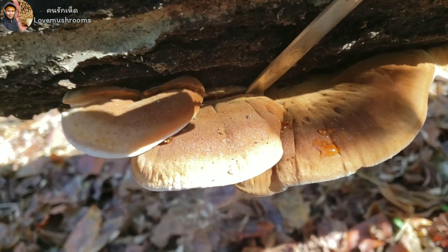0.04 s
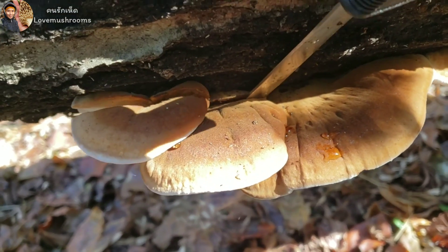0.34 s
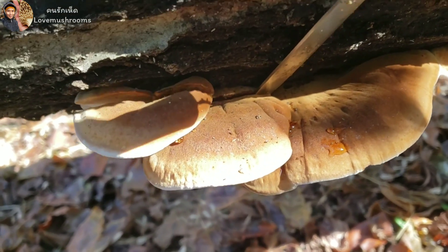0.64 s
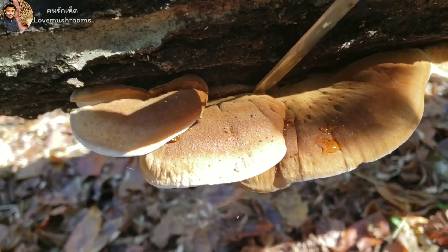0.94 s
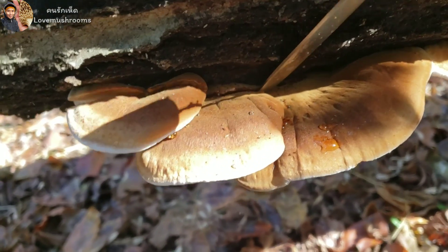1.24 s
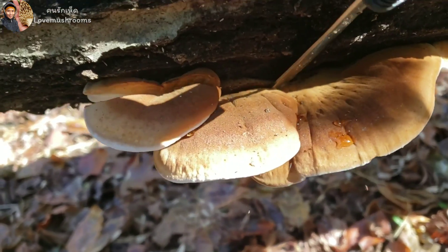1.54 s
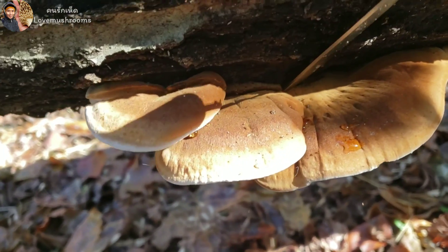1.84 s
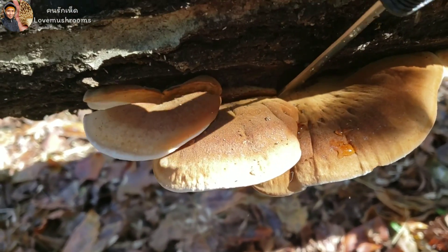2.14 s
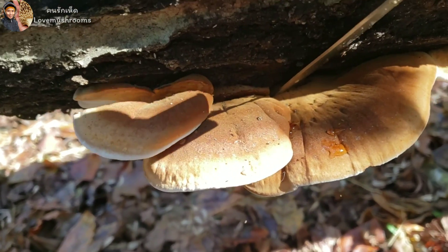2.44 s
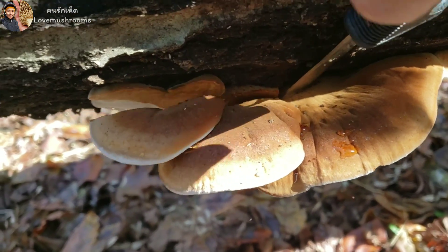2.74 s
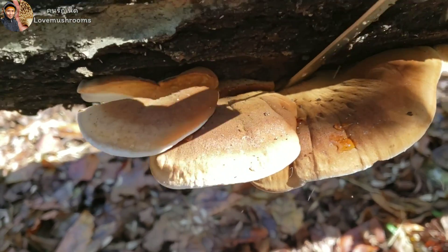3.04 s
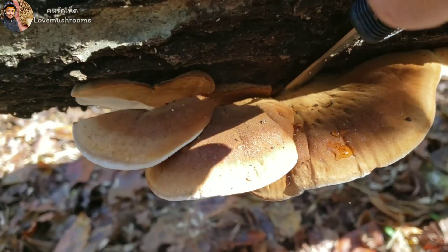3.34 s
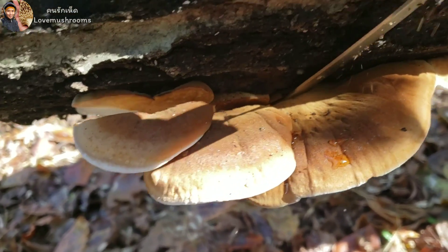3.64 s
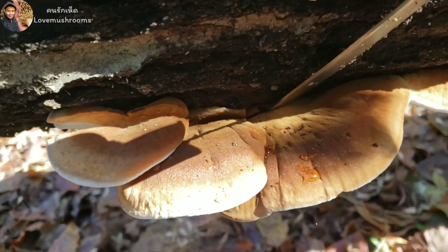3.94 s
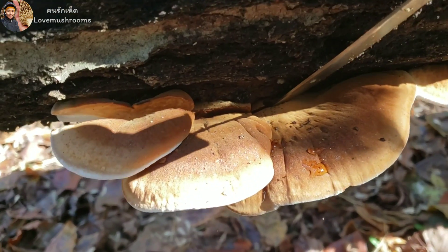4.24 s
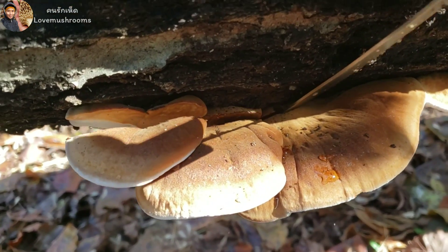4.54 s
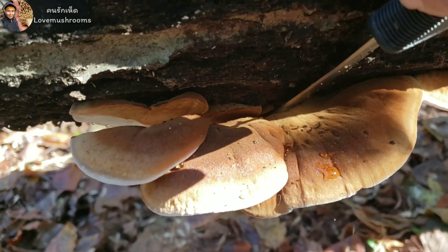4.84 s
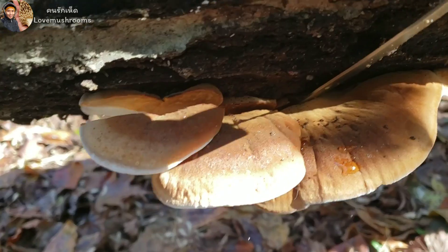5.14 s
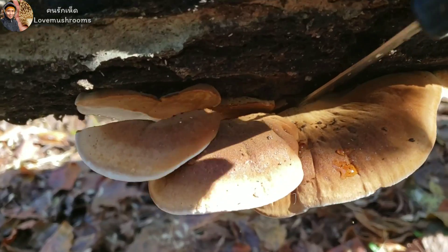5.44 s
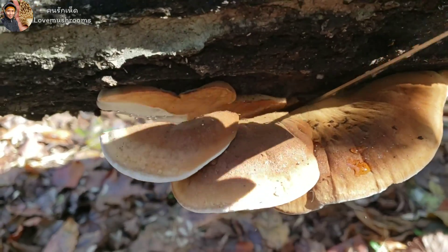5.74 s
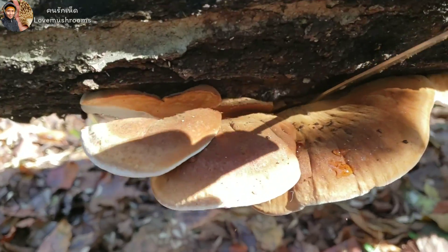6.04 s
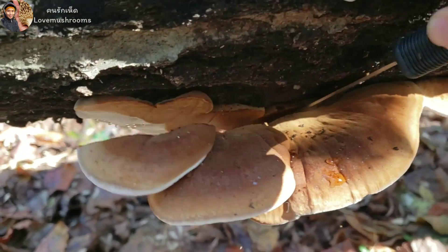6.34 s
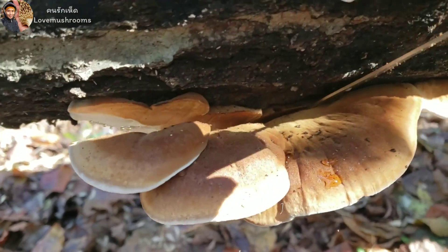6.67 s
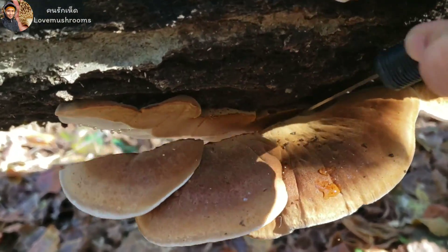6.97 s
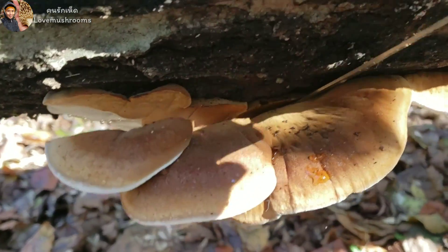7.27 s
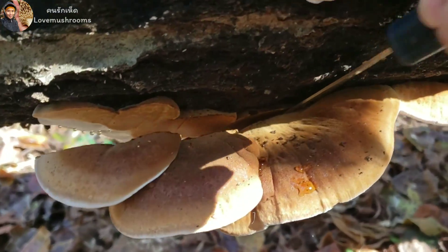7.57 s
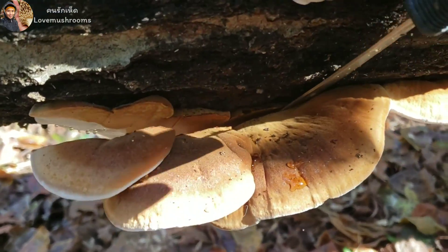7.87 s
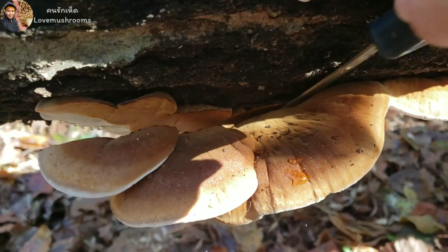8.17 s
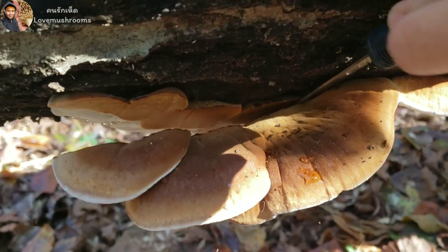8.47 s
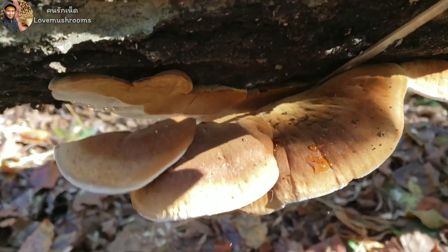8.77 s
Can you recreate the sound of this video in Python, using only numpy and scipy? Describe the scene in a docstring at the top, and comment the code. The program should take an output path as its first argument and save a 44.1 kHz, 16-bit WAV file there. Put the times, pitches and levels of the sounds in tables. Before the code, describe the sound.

A knife saws through a damp bracket fungus on a log, with short wet squeaks, grainy rasps and occasional dull taps.

```python
"""In a still forest, a knife saws through the damp flesh of a bracket fungus on a log, close to a phone.
The edge tears tiny cells into a grainy rasp and a wet hiss. Where the flesh grips the blade it sticks
and slips, squeaking upward as it speeds up and downward as it slows. The tip grates, thumps and taps
on the log, the flat of the blade brushes the bark, and now and then a fibre snaps.
Underneath lie faint air and the low rumble of the hand that holds the phone."""
import sys
import numpy as np
from scipy import signal
from scipy.fft import rfft, irfft, next_fast_len
from scipy.io import wavfile
from scipy.ndimage import uniform_filter1d

SR = 44100
rng = np.random.default_rng(int(sys.argv[2]) if len(sys.argv) > 2 else 0)


def output_pcm(signal):
    """Save a mono or channel-first signal as 16-bit PCM at the path in sys.argv[1].

    Samples are clipped to [-1, 1] before scaling.
    """
    pcm = np.clip(np.atleast_2d(signal).T, -1, 1) * 32767
    wavfile.write(sys.argv[1], SR, np.round(pcm).astype(np.int16))


N = 397341
TIME = np.arange(N) / SR
TOP_HZ = 15650

# forest air tone: (frequency [Hz], gain [dB])
AIR_EQ = [(150, -4), (260, 6), (430, 3), (800, 2), (1300, -2), (2000, -2), (3500, -2), (5500, -6),
          (7200, -5), (8600, -9), (10500, -1), (15000, -2)]
# low end shared by hand rumble and log thumps: (frequency [Hz], gain [dB])
THUMP_EQ = [(20, -21), (40, -9), (58, 2.5), (90, -5.5), (150, -12), (250, -22), (500, -35.5)]
# fader ride of the hand rumble: (time [s], level [dB])
HAND_RIDE = [(0, -64), (1.0, -65.5), (1.7, -64), (2.5, -66.5), (2.95, -63), (3.3, -67.5), (4.6, -69.5),
             (5.3, -66), (5.9, -63.5), (6.7, -68.5), (7.1, -64), (9.0, -68.5)]

# pushes of the blade: (start [s], length [s], attack [s], release [s], rasp [dB],
# rise over the stroke [dB], deep layer against rasp [dB], hiss [dB], hiss left minus right [dB])
PUSH_CUES = [(0.0, .095, 0.0013, 0.014, -65.5, 14, 1, -58.5, -29.5),
             (0.051, 0.22, .012, 0.018, -53.5, 13.5, 5.5, -50.5, -8.5),
             (0.713, 0.18, 0.0078, 0.087, -52.5, 12.5, -1, -56, -8),
             (1.292, 0.19, 0.055, 0.1, -47, 14, -3, -50.5, -8),
             (1.947, 0.25, 0.092, 0.083, -44.5, -2.5, -4, -55, -6.5),
             (2.604, 0.2, 0.071, 0.026, -45, -7, -7.5, -53, -4),
             (3.248, 0.17, 0.043, 0.051, -49, -3.5, -5, -60, -3),
             (4.08, 0.18, 0.024, .06, -66.5, 9, -22.5, -67, -12),
             (4.565, 0.24, 0.062, 0.015, -49, -6, -6.5, -59, -5),
             (5.358, 0.32, 0.11, 0.23, -46, 3, -4.5, -53.5, -6),
             (6.11, 0.222, 0.049, 0.021, -47, -10, -6, -54.5, -0.5),
             (6.834, 0.22, 0.052, 0.011, -48, -8, -8.5, -54.5, -4),
             (7.502, 0.21, 0.081, 0.049, -51, 0, -9, -54.5, -2.5),
             (7.996, 0.15, 0.046, 0.019, -51, -1.5, -10.5, -51.5, -3),
             (8.399, .15, 0.057, 0.012, -54.5, -2.5, -6, -50, -5),
             (8.801, 0.21, 0.077, 0.15, -54.5, 13, -0.5, -51, -5)]
# pulls of the blade: (start [s], length [s], rasp [dB], rise over the stroke [dB],
# deep layer against rasp [dB], hiss [dB], hiss left minus right [dB])
PULL_CUES = [(0.448, 0.14, -52, 7.5, -3.5, -58.5, -1), (0.95, 0.18, -50, 12, -5, -55, -5),
             (1.623, 0.2, -49.5, 0, -4, -53, -8.5), (2.354, 0.09, -47.5, 5, -1, -51.5, -6),
             (2.92, 0.13, -47.5, -2, -3.5, -57.5, -7.5), (3.577, 0.25, -48.5, 5, -6, -55, -4.5),
             (5.054, 0.14, -49.5, -2, -6, -54, -5), (5.732, 0.23, -48.5, 16, -8, -58, 0),
             (6.462, .19, -46.5, 11.5, -13, -57, -1), (7.194, 0.22, -49, 11.5, -11.5, -56, -1.5),
             (7.785, 0.14, -51.5, 10, -13.5, -55, -4.5), (8.213, 0.16, -54, -2, -8.5, -54, -2.5),
             (8.616, 0.16, -56.5, -9, -6, -56, -5)]
# rasp of the flesh: (frequency [Hz], gain [dB])
RASP_EQ = [(1400, -39.5), (2000, -14.5), (2500, -2), (3100, 4), (3700, -2), (4400, -4.5), (5400, -21),
           (7000, -47.5)]
# deeper rasp from the thick base of the fungus: (frequency [Hz], gain [dB])
DEEP_RASP_EQ = [(400, -37), (750, -12), (1130, -21), (1450, -1), (1900, 3.5), (2300, 0.5), (3000, -20),
                (5000, -37)]
# wet hiss along the steel: (frequency [Hz], gain [dB])
HISS_EQ = [(3000, -18), (5500, -6.5), (7100, 1.5), (8300, -5), (9600, 2.5), (11000, 2.5), (13300, -10.5),
           (15300, -9)]

# stick-slip squeaks: (start [s], length [ms], start pitch [Hz], middle pitch [Hz], end pitch [Hz],
# level [dB], peak position [0-1], roughness [0-1], overtones [dB])
SQUEAK_CUES = [(0.058, 28, 1074, 1352, 1550, -28, 1, .15, -9),
               (0.076, 33, 2220, 2570, 2950, -25.5, 0.15, .16, -4.5),
               (0.1, 23, 2080, 1970, 1900, -37, 0.4, .3, -5.5),
               (0.118, 88.6, 1973, 1780, 2043, -20, 0.47, 0, -10),
               (0.222, 13, 1706, 1910, 2000, -31, 0.9, .8, -5),
               (0.234, 34, 1928, 2120, 1990, -29, 0.4, 0, 0.5),
               (0.261, 16.7, 1787, 1524, 1316, -38.5, 0.1, 0.94, -3.5),
               (0.44, 35.4, 1004, 1660, 2540, -25.5, 0.71, 0.5, -7.5),
               (0.544, 9.5, 2510, 2073, 1830, -24.5, 0.3, 0, -2),
               (0.552, 22.6, 1860, 1511, 970, -25.5, 0.1, 0.4, -11.5),
               (0.714, 16.3, 1110, 1222, 1450, -37, 0.9, 0, -6.5),
               (0.727, 34, 1580, 2200, 2590, -29.5, .3, .24, -2.5),
               (0.746, 29.7, 1605, 1840, 2180, -24, .4, 0.07, -14),
               (0.964, 24.7, 1306, 1480, 2310, -28, 0.97, 0.38, -5),
               (1.1, 21.6, 2560, 2025, 1590, -29.5, 0.73, 0.28, 1.5),
               (1.652, 28.7, 1107, 1394, 1770, -33, 1, 0.44, -4),
               (1.793, 27.4, 1997, 1440, 1190, -28.5, 0.2, 0.28, -8),
               (1.993, 56, 1380, 1970, 3190, -45, 0.44, 0.42, -9),
               (2.311, 40.8, 1667, 2032, 3460, -29, 0.92, 0.28, 10),
               (2.411, 23, 2012, 1550, 1210, -22.5, 0.33, .35, -0.5),
               (2.917, 17, 677, 900, 1220, -20, 1, 0.37, -1.5),
               (2.932, 16, 1497, 1828, 2280, -22.5, .25, 0.74, 0),
               (2.937, 28.8, 2350, 2896, 3730, -17.5, .65, .18, -1.5),
               (3.009, 20, 3690, 2585, 2285, -24.5, 0.28, 0, 5.5),
               (3.024, 14, 2255, 1795, 900, -24.5, 0.23, 0.47, 0),
               (3.571, 24, 727, 855, 1197, -22.5, 1, 0.6, -2.5),
               (3.589, 13.6, 2424, 2572, 2950, -16, 0.6, 0.5, -9),
               (3.594, 21.4, 1807, 2095, 2530, -18, 0.23, .26, -7),
               (3.785, 21.5, 3550, 2605, 1600, -21.5, 0.35, 0.27, 1.5),
               (5.063, 20.8, 2013, 2963, 3790, -25, 0.78, 0.37, 1.5),
               (5.172, 16.9, 3430, 2180, 1330, -24, 0.17, 0.27, -9),
               (5.557, 20, 1555, 1405, 1290, -38.5, 0.2, 0.31, 3),
               (5.569, 21, 1366, 1543, 1720, -40, 0.4, 0.43, -4.5),
               (5.73, 26.6, 934, 1062, 1240, -28, 0.6, 0.4, -1.5),
               (5.747, 18.9, 2040, 2866, 3530, -19, 0.39, 0.36, -11),
               (5.916, 24.4, 3310, 2650, 1780, -15.5, 0.47, .16, -3),
               (5.936, 16.8, 1870, 1305, 800, -23.5, 0, .55, -0.5),
               (6.309, 12, 2395, 1830, 1404, -35.5, 0.4, 0.51, -11.5),
               (6.459, 29, 1377, 1545, 1806, -24.5, 0.9, 0.39, 0.5),
               (6.484, 14.3, 3130, 3385, 3670, -21.5, 0.2, 0.2, -8),
               (6.586, 57, 3970, 3285, 2930, -30.5, 0.66, 0.13, 11.5),
               (6.629, 26.6, 2555, 2297, 2170, -24, 0.25, 0.1, 4.5),
               (6.648, 19.4, 2130, 1605, 1263, -30, 0.4, 0.51, 4),
               (6.855, 28.8, 2270, 2480, 3560, -26.5, 0.76, 0.05, -2),
               (7.063, 10.2, 2040, 1740, 1410, -48, 0.57, 0.9, -11),
               (7.174, 22, 1880, 2160, 2580, -42, 0.84, 0.45, 7),
               (7.191, 25.6, 2730, 3235, 3430, -25.5, 0.24, 0.3, -4),
               (7.333, 46, 4020, 3480, 3060, -21.5, 0.9, .07, -2),
               (7.374, 18.3, 2193, 1834, 1410, -26.5, 0.78, .3, -0.5),
               (7.552, 38, 2215, 2300, 2410, -41.5, 0.4, 0.09, -7),
               (7.784, 24, 3370, 4060, 4000, -43, 0.53, 0.41, -16),
               (7.893, 16, 3530, 2275, 1550, -29.5, 0.27, 0.28, 1),
               (8.135, 10.2, 2960, 2090, 1610, -35.5, 0.5, 0.34, -3.5),
               (8.224, 10.6, 2380, 2705, 3200, -36, 0.95, 0.28, -13),
               (8.341, 13.7, 2795, 2290, 1820, -35, 0.36, 0.42, 0.5),
               (8.544, 9.7, 2020, 1740, 1330, -31.5, 0.64, 0.47, -4),
               (8.627, 20.6, 1570, 1840, 2570, -22.5, 0.8, 0.19, -5.5),
               (8.745, 13.3, 2765, 2276, 1420, -29.5, 0.45, 0.48, -14)]
# body of a squeak: (frequency [Hz], gain [dB])
SQUEAK_EQ = [(300, -33.5), (520, -28.5), (760, -5.5), (1100, -18.5), (1500, -1.5), (1900, -1), (3100, 4.5),
             (4000, -1), (5500, -12), (7000, -9.5), (8500, -22.5), (10700, -4), (13000, -24.5),
             (15000, -29.5)]

# the flat of the blade on the bark: (peak time [s], level [dB], rise [s], decay [s])
BRUSH_CUES = [(0.08, -44, .014, .012), (1.381, -36, 0.023, 0.0068), (1.883, -32, 0.0057, .037)]
# bright, dry bark: (frequency [Hz], gain [dB])
BARK_EQ = [(800, -12), (1600, -6.5), (2600, -4.5), (3600, 6.5), (5300, -1), (7500, 8.5), (8300, 4),
           (10000, 10), (12000, 7), (15300, 3)]

# the tip bears on the log: (start [s], grating length [s], grating [dB], thump [dB])
BUMP_CUES = [(0.196, 0.056, -46.5, -47), (0.563, 0.026, -51, -64.5), (0.816, 0.072, -53, -60.5),
             (1.432, 0.053, -49, -49), (2.111, 0.071, -49, -60), (2.432, 0.021, -47, -63.5),
             (2.72, 0.032, -37.5, -49.5), (2.768, 0.017, -39, -48.5), (3.023, .024, -38, -50.5),
             (3.295, 0.075, -53.5, -78), (3.367, 0.039, -48, -47.5), (3.593, 0.088, -45, -53.5),
             (4.707, 0.041, -54, -53), (4.744, 0.086, -61.5, -58.5), (5.502, 0.041, -51.5, -81),
             (5.532, .075, -59.5, -48.5), (6.018, .04, -77.5, -46.5), (6.273, .042, -51, -44),
             (6.974, 0.12, -46, -40.5), (7.204, 0.064, -56.5, -56.5), (7.634, 0.086, -60.5, -65),
             (8.113, 0.041, -53, -50), (8.538, 0.042, -69, -52.5)]
# woody midrange of the grating: (frequency [Hz], gain [dB])
GRATE_EQ = [(130, -25.5), (240, -10), (340, -5.5), (520, -4), (720, 8), (950, 6), (1150, -11), (1600, -9),
            (3000, -26)]

# snapping fibres: (time [s], edge [dB], knock [dB], left minus right [dB])
SNAP_CUES = [(0.2115, -53.5, -36.5, -4), (0.2321, -47.5, -48.5, -3.5), (0.9467, -56, -43.5, 1),
             (0.9586, -65, -48.5, 16), (1.4357, -35, -48.5, 9), (1.5857, -51.5, -91, 10),
             (1.614, -60.5, -93, 1), (2.1473, -45.5, -62, 1), (2.5068, -56, -63.5, -3),
             (2.6963, -37, -27.5, 4), (3.0869, -61.5, -67.5, 2), (5.217, -63.5, -69, -10.5),
             (6.0406, -57.5, -72, -18.5), (6.09, -67.5, -69, -5), (6.3125, -65, -55, 14),
             (6.333, -61, -61.5, 5), (7.064, -63, -48.5, 17)]
# a snap's knock in the flesh: (frequency [Hz], gain [dB])
SNAP_KNOCK_EQ = [(300, -38.5), (750, -26.5), (1100, -7.5), (1600, 4.5), (3200, 9.5), (4300, 6.5),
                 (6000, -38.5), (10000, -44.5)]
# a snap's sharp edge: (frequency [Hz], gain [dB])
SNAP_EDGE_EQ = [(2500, -17.5), (4500, -13.5), (7000, 9), (8500, -7), (10500, 9.5), (15000, -17)]

# the tip taps the log: (time [s], level [dB])
TAP_CUES = [(2.735, -24), (2.777, -47), (2.783, -38.5), (2.978, -43.5), (3.3, -44.5), (3.381, -43.5),
            (3.625, -30), (3.648, -40), (4.349, -61.5), (4.716, -43.5), (4.745, -45), (4.79, -52.5),
            (7.02, -33.5)]
# modes of the soft, rotten wood: (frequency [Hz], level [dB], time to fall 60 dB [s])
WOOD_MODES = [(227, -14.5, .06), (430, -11, 0.016), (577, -1.5, .028), (715, 4.5, 0.039),
              (905, -17.5, 0.013), (1728, 0.5, 0.016)]

# stereo image of the air and rumble: (frequency [Hz], left-right likeness [0-1])
BED_IMAGE = [(50, 1), (250, 1), (500, 0.2), (15000, 0.13)]
# stereo image of the knife noises: (frequency [Hz], left-right likeness [0-1])
CLOSE_IMAGE = [(50, 0.24), (700, 1), (3200, 0.54), (4500, 0.24), (8000, 0.067), (15000, .1)]
# balance between the phone's two microphones: (frequency [Hz], left minus right [dB])
MIC_BALANCE = [(50, -6), (250, 0.73), (750, 0), (2500, 1), (3600, 1), (5000, -4), (7200, 0.33), (10000, -6),
               (12000, -6), (13500, -14), (15300, -5)]
# the left microphone hears the treble later: (frequency [Hz], left phase lead [rad])
MIC_PHASE = [(700, 0.5), (2200, 0.1), (3200, 0.35), (4100, -0.76), (5500, -1.5), (7000, -5), (8700, -7),
             (10700, -8.5), (15000, -6.5)]


def undb(db):
    """Decibels to gain."""
    return 10 ** (np.asarray(db) / 20)


def unit(x):
    """Scale to rms 1."""
    return x / np.sqrt(np.mean(x ** 2))


def curve_at(points, hz):
    """Read (frequency [Hz], value) points on a log-frequency axis."""
    point_hz, value = np.transpose(points)
    return np.interp(np.log(hz + 1), np.log(point_hz), value)


def eq(x, points, size=4096):
    """Minimum-phase EQ through (frequency [Hz], gain [dB]) points."""
    gain = undb(curve_at(points, np.fft.rfftfreq(size, 1 / SR)))
    cepstrum = irfft(np.log(gain))
    cepstrum[1:size // 2] *= 2
    cepstrum[size // 2 + 1:] = 0
    response = irfft(np.exp(rfft(cepstrum)))
    return signal.oaconvolve(np.atleast_2d(x), response[None], axes=1)[:, :x.shape[-1]]


def stereo_noise(image):
    """White noise whose two sides are as alike in each band as the image says."""
    size = next_fast_len(N, True)
    likeness = np.clip(curve_at(image, np.fft.rfftfreq(size, 1 / SR)), 0, 1)
    mid, side = rfft(rng.standard_normal((2, size)))
    mid, side = mid * np.sqrt(1 + likeness), side * np.sqrt(1 - likeness)
    return unit(irfft([mid + side, mid - side])[:, :N])


def pan(db):
    """Left and right gains for a left-minus-right level difference."""
    return undb(np.array([[1], [-1]]) * db / 2) / np.cosh(np.log(undb(db / 2)))


def wander(rate):
    """Random modulation with `rate` new values a second and a spread near 1."""
    return np.interp(TIME * rate, np.arange(N // 8), rng.standard_normal(N // 8))


def fade(u):
    """Smooth fade from 0 to 1 as u goes from 0 to 1."""
    return np.sin(np.pi / 2 * np.clip(u, 0, 1)) ** 2


def add(out, start_s, sound):
    """Mix a sound in at its cue."""
    i = int(start_s * SR)
    out[:, i:i + sound.shape[1]] += sound[:, :N - i]


def forest_bed(air_db=-77.7, flutter_db=1.5, sway_db=0.5):
    """Still air hisses faintly; the hand on the phone adds a low, swaying rumble."""
    air = unit(eq(stereo_noise(BED_IMAGE), AIR_EQ)) * undb(air_db + flutter_db * wander(3))
    hand_db = np.interp(TIME, *np.transpose(HAND_RIDE)) + sway_db * wander(8.6)
    rumble = unit(eq(stereo_noise(BED_IMAGE), THUMP_EQ)) * undb(hand_db)
    return air + rumble * pan(-6)


def stroke(length_s, attack_s, release_s, rasp_db, rise_db, deep_db, hiss_db, pan_db,
           grip_db=0, bite_db=0):
    """Envelopes of one stroke (rasp, deep rasp, left hiss, right hiss); slow ends sound darker."""
    t = TIME[:int(length_s * SR)]
    along = t / length_s - .5
    slowness = (2 * along) ** 2
    contact = fade(t / attack_s) * fade((length_s - t) / release_s)
    bite = np.exp(-np.abs(t - attack_s) / .02)  # a brief accent as the edge digs in
    rasp = contact * undb(rasp_db + rise_db * along + grip_db * slowness + bite_db * (bite - bite.mean()))
    deep = rasp * undb(deep_db + 3.5 * (slowness - slowness.mean()))
    hiss = contact * undb(hiss_db - 6 * slowness) * pan(pan_db)
    return np.vstack([rasp, deep, hiss])


def sawing(grain_db=0.5, catch_db=1.5, crackle_db=3, pull_fade_s=0.036, creep_db=-26, creep_s=0.056):
    """The sliding edge tears countless tiny cells: a rasp in the flesh, a wet hiss along the steel."""
    envelopes = np.zeros((4, N))
    for start_s, length_s, *levels in PULL_CUES:
        add(envelopes, start_s, stroke(length_s, pull_fade_s, pull_fade_s, *levels, grip_db=7.5))
    for start_s, *push in PUSH_CUES:
        add(envelopes, start_s, stroke(*push, bite_db=2.5))
    # the blade creeps on faintly after each stroke
    pole = np.exp(-1 / (creep_s * SR))
    envelopes += undb(creep_db) * signal.lfilter([1 - pole], [1, -pole], envelopes + 1e-18)
    tearing = undb(grain_db * wander(1800) + catch_db * wander(90))

    def grains(tone, texture=1):
        return unit(eq(stereo_noise(CLOSE_IMAGE) * tearing * texture, tone))

    rasp = grains(RASP_EQ) * envelopes[0]
    deep = undb(-1) * grains(DEEP_RASP_EQ) * envelopes[1]
    crackle = undb(crackle_db * wander(2500))
    hiss = undb(3) * grains(HISS_EQ, crackle) * envelopes[2:]
    return (rasp + deep) * pan(3) + hiss * pan(5)


def stick_slip(length_ms, pitches_hz, peak, rough, overtone_db, jitter=.25, waver=0.005, flat_top_ms=69):
    """One squeak: a rounded sawtooth whose pitch follows blade speed; torn flesh makes it uneven."""
    n = int(length_ms * SR / 1000)
    progress = np.linspace(0, 1, n)
    timing, strength, grit, drag = rng.standard_normal((4, SR // 8))
    # the blade drags a little faster and slower through the fibres
    drag = np.interp(TIME[:n] * 260, np.arange(len(drag)), drag)
    glide = np.polyval(np.polyfit([0, .5, 1], pitches_hz, 2), progress)
    hz = glide * (1 + waver * drag)
    slips = np.cumsum(hz) / SR

    def per_slip(chance):
        return rough * np.interp(slips, np.arange(len(chance)), chance)

    phase = 2 * np.pi * np.cumsum(hz * (1 + jitter * per_slip(timing))) / SR
    # a clean, sharp release gives stronger overtones
    harmonic = np.arange(2, 11)[:, None]
    rolloff = (harmonic / 2) ** (0.24 + 1.6 * rough)
    overtones = (harmonic * hz < TOP_HZ) * np.sin(harmonic * phase) / 2 / rolloff
    saw = np.sin(phase) + undb(overtone_db) * overtones.sum(axis=0)
    force = saw * undb(8 * per_slip(strength)) + (0.036 + 0.55 * rough) * grit[:n]
    tone = eq(force, SQUEAK_EQ)[0]
    tone /= np.sqrt(uniform_filter1d(tone ** 2, size=300) + 1e-12)  # level it before shaping
    # the grip builds and lets go: short squeaks are pointed, long ones flat on top
    arch = np.interp(progress, [0, np.clip(peak, .15, .85), 1], [0, .5, 1])
    sharpness = 1.33 / (1 + (length_ms / flat_top_ms) ** 3)
    grip = np.abs(np.sin(np.pi * arch)) ** sharpness
    return tone * grip * undb(6 * rough * drag)


def squeaks(wet_db=-31.5, drying_db_per_s=0.04, lead_s=0.0064, lag_s=0.0053, tail_db=-29, tail_s=0.018):
    """Squeaks wrapped in the hiss of the wet blade, with a short scatter off the log and leaves."""
    dry, wetness = np.zeros((2, N)), np.zeros(N)
    for start_s, length_ms, *pitches_hz, db, peak, rough, overtone_db in SQUEAK_CUES:
        place = pan(2.5 + 0.5 * start_s)  # the cut drifts slowly leftward
        add(dry, start_s, undb(db) * place * stick_slip(length_ms, pitches_hz, peak, rough, overtone_db))
        end_s = start_s + length_ms / 1000
        span = slice(int((start_s - lead_s) * SR), int((end_s + lag_s) * SR))
        # a clean squeak tears less, so it hisses less; the blade dries as the cut opens
        tearing = undb(db + wet_db - drying_db_per_s * start_s) * min(1, 0.41 + 2 * rough)
        window = signal.windows.tukey(span.stop - span.start, .7)
        wetness[span] = np.maximum(wetness[span], tearing * window)
    t = TIME[:SR // 6]
    tail = rng.standard_normal((2, len(t))) * np.exp(-t / tail_s)
    tail *= undb(tail_db) / np.sqrt(np.sum(tail[0] ** 2))
    scatter = signal.oaconvolve(dry, tail, axes=1)[:, :N]
    hiss = unit(eq(stereo_noise(CLOSE_IMAGE), HISS_EQ)) * wetness * pan(-1)
    return dry + scatter + hiss


def bark_brushes(grain_db=2.0):
    """Steel skims dry bark in bright swishes that swell and die away."""
    swish = unit(eq(stereo_noise(CLOSE_IMAGE) * undb(grain_db * wander(1000)), BARK_EQ))
    envelope = np.zeros(N)
    for peak_s, db, rise_s, decay_s in BRUSH_CUES:
        slopes = np.minimum((TIME - peak_s) / rise_s, (peak_s - TIME) / decay_s)
        envelope += undb(db) * np.exp(np.maximum(slopes, -20))
    return swish * envelope * pan(-9)


def log_bumps(jerk_db=5, thump_decay_s=0.037):
    """The tip grates over the wood in jerks; the load builds meanwhile and thumps the log."""
    grate_gain, thump_gain = np.zeros((2, 1, N))
    t = TIME[:SR // 3]
    for start_s, length_s, grate_db, thump_db in BUMP_CUES:
        contact = np.sin(np.pi * np.minimum(t / length_s, 1)) ** 2
        add(grate_gain, start_s, undb(grate_db) * contact[None])
        rise_s = 0.37 * length_s
        load = fade(t / rise_s) * np.exp(-np.maximum(t - rise_s, 0) / thump_decay_s)
        add(thump_gain, start_s, undb(thump_db) * load[None])
    grate = unit(eq(stereo_noise(CLOSE_IMAGE) * undb(jerk_db * wander(170)), GRATE_EQ))
    thump = unit(eq(stereo_noise(CLOSE_IMAGE), THUMP_EQ))
    return undb(-1) * grate * grate_gain + thump * thump_gain


def fibre_snaps(decay_s=0.00074, trim_db=11):
    """A fibre parts: a sharp edge over a brief knock in the flesh."""
    out, t = np.zeros((2, N)), TIME[:SR // 40]
    envelope = (t / decay_s) * np.exp(1 - t / decay_s)
    for start_s, edge_db, knock_db, pan_db in SNAP_CUES:
        knock_noise, edge_noise = rng.standard_normal((2, len(t)))
        knock = undb(knock_db + trim_db) * unit(eq(knock_noise, SNAP_KNOCK_EQ))
        edge = undb(edge_db + trim_db) * unit(eq(edge_noise, SNAP_EDGE_EQ))
        add(out, start_s, (knock + edge) * envelope * pan(pan_db))
    return out


def log_taps(scatter_db=2, detune=0.053, contact_s=0.00088):
    """Dull taps of the tip: each rings the same few modes of the log, a little differently."""
    out, t = np.zeros((2, N)), TIME[:SR // 12]
    hz, mode_db, t60 = np.transpose(WOOD_MODES)[:, :, None]
    attack = 1 - np.exp(-t / contact_s)
    for start_s, db in TAP_CUES:
        strength, tuning = rng.standard_normal((2, len(hz), 1))
        decay = undb(mode_db + scatter_db * strength - 60 * t / t60)
        modes = decay * np.sin(2 * np.pi * hz * (1 + detune * tuning) * t)
        add(out, start_s, 3 * undb(db) * modes.mean(axis=0) * attack * pan(0))
    return out


def microphones(knife):
    """The close knife reaches the two microphones with different colours and delays."""
    left = eq(knife[0], [(hz, db / 2) for hz, db in MIC_BALANCE])[0]
    right = eq(knife[1], [(hz, -db / 2) for hz, db in MIC_BALANCE])[0]
    size = next_fast_len(N, True)
    left_lead = curve_at(MIC_PHASE, np.fft.rfftfreq(size, 1 / SR))
    right = irfft(rfft(right, size) * np.exp(-1j * left_lead), size)[:N]
    return np.array([left, right])


def scene():
    """The knife up close, over the forest bed."""
    knife = squeaks() + sawing() + log_bumps() + log_taps() + bark_brushes() + fibre_snaps()
    return microphones(knife) + forest_bed()


def record(dry):
    """The phone shaves off the top with a steep low-pass."""
    return signal.sosfilt(signal.ellip(10, .2, 70, TOP_HZ, fs=SR, output="sos"), dry)


dry = scene()
out = record(dry)
output_pcm(out)
```